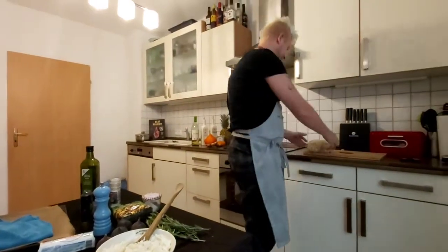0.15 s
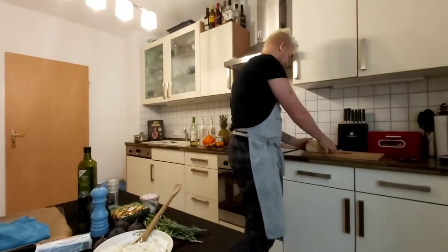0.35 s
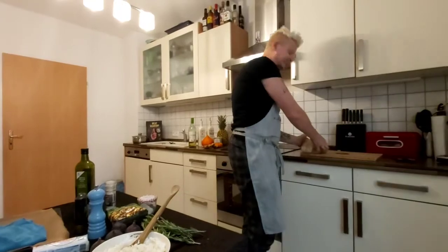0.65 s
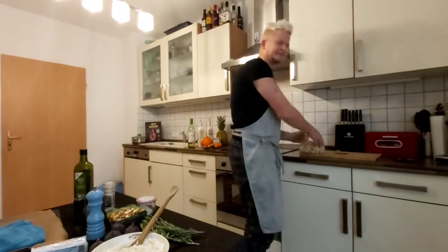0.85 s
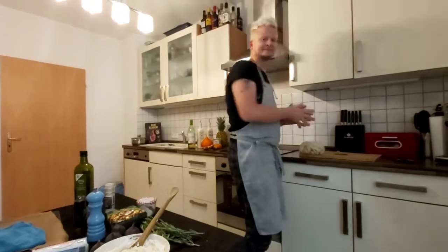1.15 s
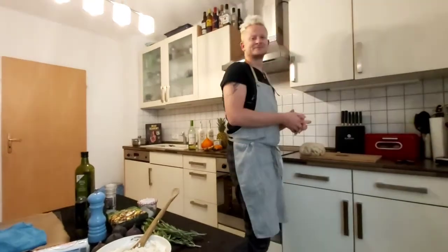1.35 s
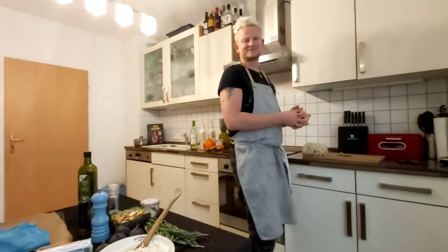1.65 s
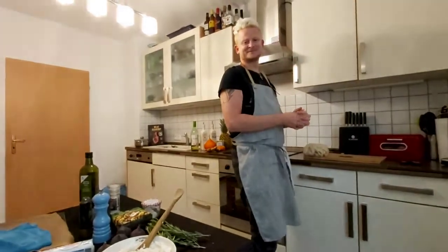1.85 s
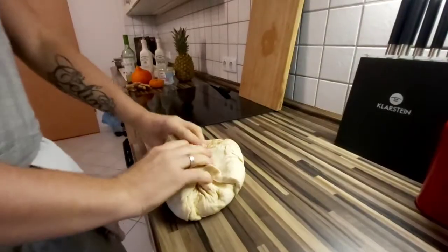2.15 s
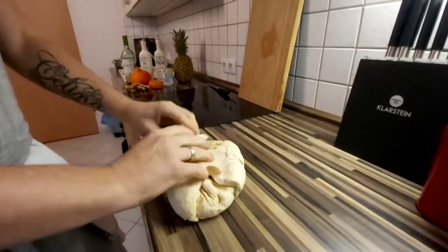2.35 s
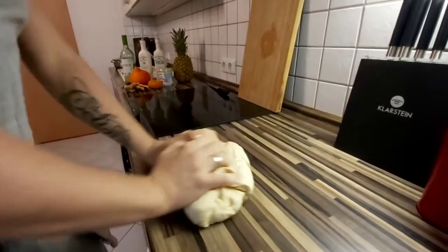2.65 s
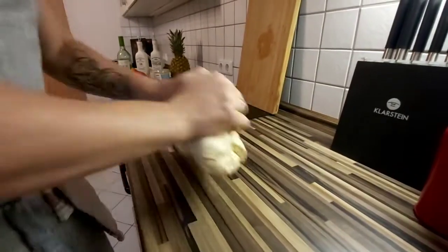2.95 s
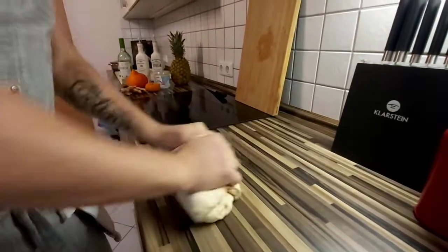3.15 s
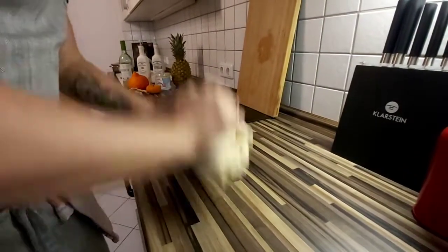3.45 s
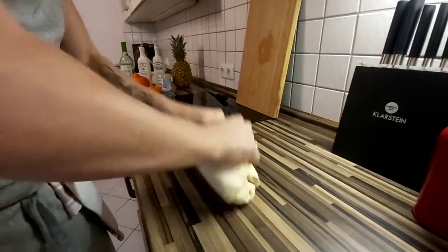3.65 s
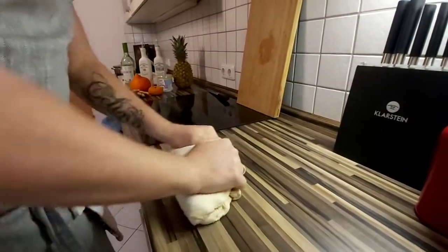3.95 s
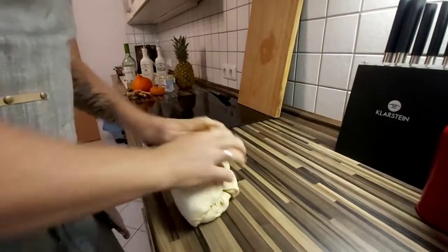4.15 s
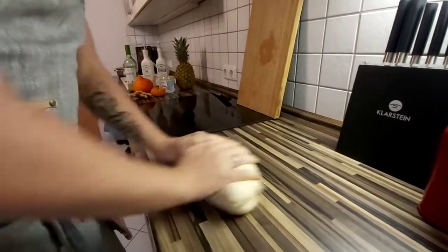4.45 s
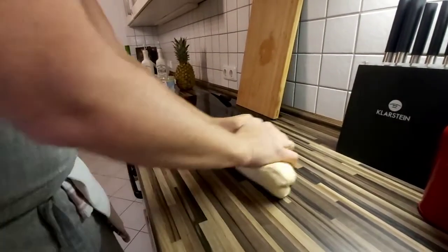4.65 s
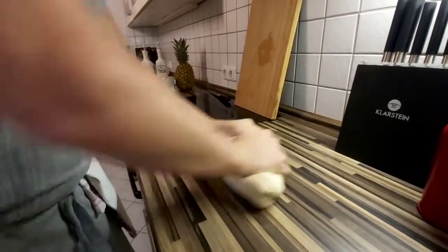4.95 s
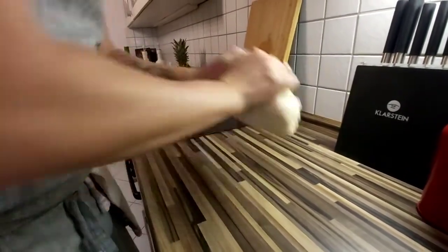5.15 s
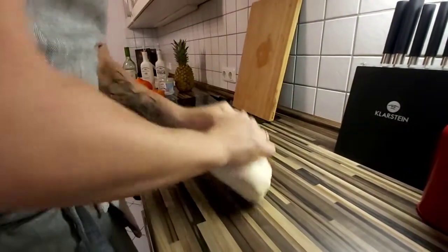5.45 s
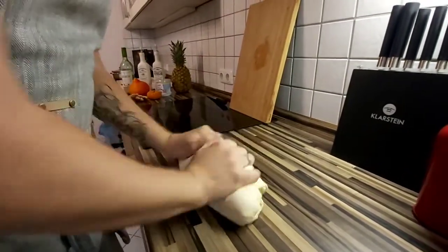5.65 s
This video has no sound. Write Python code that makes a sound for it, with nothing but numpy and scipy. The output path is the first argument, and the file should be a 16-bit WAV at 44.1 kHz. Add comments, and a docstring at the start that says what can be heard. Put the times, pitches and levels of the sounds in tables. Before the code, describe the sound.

In a tiled home kitchen a fridge hums while palms rub softly across the room. The microphone then sits on the worktop, where the hum is deeper and stronger and dough slides faintly over flour. The dough is slammed down three times, rubbed about, and slammed twice more. Each close, wet slap makes the slab boom and rings briefly around the tiles.

```python
"""Dough is worked by hand in a tiled kitchen, with a fridge humming. From across the room, palms rub
softly together and an air pocket pops. At 2.3 s the microphone is on the worktop itself: a faint ring
fades, the hum comes through the slab, and dough slides over flour. From 3.2 s the dough is slammed down
three times, rubbed about, then slammed twice more. Each slam slaps, sets the worktop booming, rings round
the tiles and makes the recorder's gain control duck."""
import sys
import numpy as np
from scipy import signal
from scipy.io import wavfile
from scipy.ndimage import uniform_filter1d

SR = 44100
rng = np.random.default_rng(int(sys.argv[2]) if len(sys.argv) > 2 else 0)


def inscribe(sig):
    """Save sig as 16-bit PCM at rate SR to the path in sys.argv[1].

    A 1-D sig is mono; a 2-D sig holds one channel per row.
    Samples are clipped to [-1, 1] before scaling.
    """
    pcm = np.round(np.clip(np.atleast_2d(sig).T, -1, 1) * 32767)
    wavfile.write(sys.argv[1], SR, pcm.astype(np.int16))


N = 255074
TIME = np.arange(N) / SR
ON_WORKTOP_S = 2.312   # until then the microphone stands across the room

# Dough meeting or peeling off the worktop; the five slams land close to the microphone.
# Each row: start in seconds, weight in dB, contact hardness in Hz, slap level in dB,
# slap decay in seconds, squelch pitch in Hz, room level in dB.
LANDINGS = [(.52, -38, 162, -70, 0.014, 1070, -34), (3.1725, 5.5, 900, -5, 0.0018, 3830, 8.5),
            (3.5821, 9.5, 1000, -3, .0018, 11500, 11.5), (3.9388, -3.5, 890, -12, 0.016, 1900, -22),
            (3.9525, 7, 71, -21, 0.0016, 870, -5.5), (4.334, -44, 924, -39, 0.0044, 7500, -34.5),
            (4.728, -33, 402, -52, 0.0033, 1090, -53), (5.112, -38.5, 395, -42, 0.0088, 4450, -54),
            (5.3851, 8.5, 1110, -3.5, 0.0034, 790, 13.5), (5.7217, 3, 211, -3.5, 0.0069, 4620, .5)]
# The wet slap, heard close. Each row: frequency in Hz, level in dB per Hz.
SLAP_SPECTRUM = [(150, 10), (400, 3), (800, 5.5), (1200, -0.5), (2000, -5.5), (4800, -5), (7600, -14),
                 (9000, -22.5), (12000, -12.5), (15000, -15.5)]
# What the tiles send back to the microphone. Each row: frequency in Hz, level in dB per Hz.
TILE_SPECTRUM = [(40, 0.5), (160, -6), (280, 2.5), (500, -2), (780, -4.5), (1200, -11), (2200, -12),
                 (3200, -16), (4400, -16), (7500, -23.5), (9000, -30), (12000, -20.5), (15000, -31)]
# How long the kitchen rings. Each row: frequency in Hz, seconds to fall by 60 dB.
TILE_T60 = [(50, 0.92), (350, 0.71), (900, 0.72), (2400, 0.66), (6400, 0.46), (10000, 0.37), (14000, 0.32)]


def slams(room_db=-18, room_build_s=0.0096, puff_db=-9, puff_hz=330, puff_s=0.00051,
          squelch_db=4, crack_db=5):
    """Dough lands on one spot: a wet slap, a puff of squeezed air, the slab's boom and the tiled room."""
    out, t, boom = np.zeros((2, N)), TIME[:SR], worktop()
    room = noise(TILE_SPECTRUM, size=SR, t60=TILE_T60) * (1 - np.exp(-t / room_build_s))
    puff = -np.sin(2 * np.pi * puff_hz * t) * np.exp(-t / puff_s)
    thud = boom + from_db(puff_db) * puff
    splashes = noise(SLAP_SPECTRUM, size=len(LANDINGS) * 2048).reshape(2, len(LANDINGS), -1)
    for k, (s, weight_db, hard_hz, slap_db, slap_s, squelch_hz, echo_db) in enumerate(LANDINGS):
        soft = signal.butter(2, hard_hz, fs=SR, output="sos")   # a slow landing pushes only low modes
        add(out, s, from_db(weight_db) * signal.sosfilt(soft, thud))
        slap = from_db(slap_db) * splashes[:, k] * np.exp(-t[:splashes.shape[-1]] / slap_s)
        squelch = resonate(slap, squelch_hz, width_hz=450)   # air caught in a fold rings
        add(out, s, slap + from_db(squelch_db) * squelch)
        add(out, s + slap_s / 2, from_db(slap_db + crack_db) * snap())   # the last gap claps shut
        add(out, s, from_db(echo_db + room_db) * room)
    return out


# Modes of the worktop and its cabinet, right under the microphone.
# Each row: frequency in Hz, level in dB, seconds to fall by 60 dB.
WORKTOP_MODES = [(58.9, -22, 0.85), (70.1, -7.5, 0.12), (76.95, -7, 0.21), (100.2, -56, 1),
                 (105.73, -9.5, 0.59), (123.9, -14, 0.61), (138, -33.5, 0.44), (202.6, -49.5, 0.58),
                 (215.5, -21.5, 0.74), (220.4, -4, 0.078), (245.8, -18, 0.58), (263.5, -18.5, 0.51),
                 (288.2, -26.5, 0.51), (300.5, -16, 0.52), (326.6, -28.5, 1), (359, -30, 0.79),
                 (392.7, -19, 0.44), (470.6, -23.5, 0.52), (628, -22, 0.2), (727, -36.5, 1),
                 (769, -30, 0.46), (802, -38.5, 0.42), (930, -49, 0.7), (1090, -55, 0.94)]


def worktop(spread=0.26):
    """The slab takes a blow; neighbouring modes move in opposite senses, so the boom swells, then dies."""
    t, out = TIME[:SR], 0
    for k, (hz, db, t60) in enumerate(WORKTOP_MODES):
        # short waves reach the microphone's two ports out of step
        phase = spread * np.sqrt(hz / 300) * (-1) ** (k // 2) * np.array([[1], [-1]])
        decay = np.exp(-np.log(1000) * t / t60)
        out = out + (-1) ** k * from_db(db) * np.sin(2 * np.pi * hz * t + phase) * decay
    return out


# Air pockets, each right by one port of the microphone. Each row: start in seconds, level in dB,
# pitch in Hz, decay in seconds, left over right in dB.
AIR_POCKETS = [(0.769, -21.5, 2960, 0.000094, -27), (2.7954, -16.5, 890, 0.00051, 25)]


def pops(edge_db=-7, skin_db=-18):
    """Tiny air pockets burst: a sharp edge, the swing of the air, then the slower dough skin."""
    out = np.zeros((2, N))
    skin = from_db(skin_db) * swing(hz=300, decay_s=0.0012)
    for s, db, hz, decay_s, side_db in AIR_POCKETS:
        burst = from_db(edge_db) * snap() + swing(hz, decay_s) + skin
        add(out, s, -from_db(db + np.array([[side_db], [-side_db]]) / 2) * burst)
    return out


# Strokes of the hands, first across the room, then close by on the worktop.
# Each row: peak time in seconds, swell in seconds, rub level in dB, flour hiss level in dB.
HAND_STROKES = [(.09, 0.059, -63, -76), (.44, 0.095, -68.5, -82), (.57, .07, -63, -68.5),
                (.79, 0.057, -51, -59.5), (.93, .05, -89, -71), (1.12, .1, -75.5, -94),
                (1.46, 0.2, -61, -74.5), (1.77, 0.18, -98, -72), (2.08, .035, -69, -84),
                (2.48, 0.046, -82, -64.5), (2.67, 0.092, -77, -66), (2.785, 0.056, -53.5, -52),
                (2.918, 0.061, -47, -57), (4.22, 0.21, -44, -62), (4.6, 0.099, -52, -47),
                (4.878, 0.22, -58, -55.5), (5.109, 0.12, -51, -53.5)]
# Distant palms, close dough and the fine hiss of flour. Each row: frequency in Hz, level in dB per Hz.
PALM_SPECTRUM = [(500, 0), (900, -1), (1600, 2.5), (2200, 3), (2900, -3.5), (3600, -6), (4500, -4),
                 (7500, -8.5), (9000, -10)]
DOUGH_SPECTRUM = [(400, 11.5), (900, 4), (1600, 4), (2500, 2), (4300, 0.5), (5500, -4), (7500, -5),
                  (9000, -14.5)]
FLOUR_SPECTRUM = [(4000, -8), (7500, -5.5), (9000, -21.5), (12500, 5), (15000, -8)]


def rubbing(grain_db=1.0, stick_db=0.84, flour_db=3):
    """Palms rub together; later dough slides over flour. Both stick and catch in tiny grains."""
    palms, dough, flour = np.zeros((3, N))
    for s, swell_s, rub_db, hiss_db in HAND_STROKES:
        if s < ON_WORKTOP_S:
            palms += from_db(rub_db) * stroke(s, swell_s, release_s=0.093)   # the room draws out the tail
        else:
            dough += from_db(rub_db) * stroke(s, swell_s, release_s=0.049)
        flour += from_db(hiss_db) * stroke(s, swell_s, release_s=0.031)
    grains = rms_one(uniform_filter1d(rng.standard_normal(N), size=90))
    sticking = rms_one(uniform_filter1d(rng.standard_normal(N), size=700))
    roughness = rms_one(from_db(grain_db * grains + stick_db * sticking))
    return roughness * (palms * noise(PALM_SPECTRUM, size=N) * pan(db=-2)
                        + dough * noise(DOUGH_SPECTRUM, size=N) * pan(db=2)
                        + from_db(flour_db) * flour * noise(FLOUR_SPECTRUM, size=N))


def stroke(peak_s, swell_s, release_s, turn_s=0.014):
    """The hand gathers speed, turns and comes to rest; height 1."""
    early, late = np.minimum(TIME - peak_s, 0), np.maximum(TIME - peak_s, 0)
    return np.exp(-(early / swell_s) ** 2 - (np.hypot(late, turn_s) - turn_s) / release_s)


def cupped_palms(peak_s=1.37, half_length_s=0.06, db=-62, hz=2598, width_hz=650):
    """Across the room, the hollow between the hands rings as they rub."""
    swell = np.exp(-((TIME - peak_s) / half_length_s) ** 2 / 2)
    cavity = rms_one(resonate(hollow(hz, width_hz), hz, 2 * width_hz))
    return from_db(db) * swell * cavity * pan(db=-4)


# A faint ringing hiss, first heard from the worktop. Each row: centre in Hz, width in Hz, level in dB.
RING_BANDS = [(1780, 240, -63.5), (3284, 200, -76), (4230, 600, -67)]


def faint_ring(tick_db=-51, tick_s=0.013, ring_s=0.4):
    """A soft tick and a rough, thin ring that fades after it."""
    out = np.zeros((2, N))
    ring = sum(from_db(db) * hollow(hz, width_hz) for hz, width_hz, db in RING_BANDS)
    tick = from_db(tick_db) * rng.standard_normal((2, N)) * np.exp(-TIME / tick_s)
    add(out, ON_WORKTOP_S, tick + ring * np.exp(-TIME / ring_s))
    return out


# Kitchen air from across the room and from the worktop. Each row: frequency in Hz, level in dB per Hz.
AIR_ACROSS_ROOM = [(36, -1), (48, -4.5), (70, -11), (105, -1.5), (170, -10), (215, -4.5), (275, -5.5),
                   (370, 0), (560, -14.5), (1400, -29), (3500, -44.5), (15000, -42)]
AIR_AT_WORKTOP = [(28, -4), (50, -1.5), (75, 5.5), (115, 7), (170, -11.5), (290, 3.5), (390, -6),
                  (600, -16.5), (1200, -24), (4000, -39), (15000, -38)]
# The fridge from both microphone places.
# Each row: frequency in Hz, level across the room in dB, level through the worktop in dB.
FRIDGE_TONES = [(49, -67.5, -57.5), (100.3, -66, -42), (121, -72, -55), (144, -65, -69.5), (290, -68, -60),
                (359, -60, -77)]


def fridge_and_air(far_air_db=-53, near_air_db=-48, near_lift_db=1,
                   waver_hz=113.3, waver_db=-48, waver_from_s=4.2):
    """Room air and the fridge, which hums strongly through the worktop; a late tone makes it waver."""
    far = from_db(far_air_db) * noise(AIR_ACROSS_ROOM, size=N)
    near = from_db(near_air_db) * noise(AIR_AT_WORKTOP, size=N)
    for hz, room_db, slab_db in FRIDGE_TONES:
        tone = np.sqrt(2) * np.sin(2 * np.pi * (hz * TIME + rng.random()))
        far += from_db(room_db) * tone
        near += from_db(slab_db) * tone
    fade_in = np.clip((TIME - waver_from_s) * 10, 0, 1)
    waver = from_db(waver_db) * fade_in * np.sqrt(2) * np.sin(2 * np.pi * waver_hz * TIME)
    on_worktop = np.clip((TIME - ON_WORKTOP_S) * 200, 0, 1)
    return (1 - on_worktop) * far + on_worktop * (from_db(near_lift_db) * near + waver)


# How alike the kitchen sounds at the two ports. Each row: frequency in Hz, left-right correlation.
PORT_LIKENESS = [(60, 0.27), (200, 0.96), (500, 0.36), (750, 0.52), (1100, -0.17), (4000, 0.086),
                 (14000, -0.095)]


def noise(spectrum, size, t60=None):
    """Stereo noise in third-octave bands, rms 1 at its start; with t60 each band dies away."""
    out, power, t = 0, 0, np.arange(size) / SR
    edges = np.geomspace(28, 16000, 31)
    white = rng.standard_normal((2, 2, size + SR // 4))
    for k, (low, high) in enumerate(zip(edges, edges[1:])):
        if high < spectrum[0][0] or low > spectrum[-1][0]:
            continue
        hz = np.sqrt(low * high)
        mid, side = butterworth(white[k % 2], 2, [low, high], "band")[:, -size:]
        alike, gain = at_hz(PORT_LIKENESS, hz), from_db(at_hz(spectrum, hz))
        band = gain * (np.sqrt(1 + alike) * mid + np.sqrt(1 - alike) * side * [[1], [-1]])
        if t60:
            band *= np.exp(-np.log(1000) * t / at_hz(t60, hz))
        out += band
        power += gain ** 2 * 2 * (high - low) / (SR / 2)
    return out / np.sqrt(power)


def snap(hz=6500, decay_s=0.00012):
    """A sudden step of pressure that swings back and dies at once."""
    t = TIME[:SR // 50]
    return np.cos(2 * np.pi * hz * t) * np.exp(-t / decay_s)


def swing(hz, decay_s):
    """A quickly damped swing of pressure."""
    t = TIME[:SR // 50]
    return np.sin(2 * np.pi * hz * t) * np.exp(-t / decay_s)


def hollow(hz, width_hz):
    """Stereo noise in one resonance, rms 1."""
    return rms_one(resonate(rng.standard_normal((2, N)), hz, width_hz))


def resonate(x, hz, width_hz):
    """One resonance, gain 1 at its peak."""
    r = np.exp(-np.pi * width_hz / SR)
    feedback = [1, -2 * r * np.cos(2 * np.pi * hz / SR), r * r]
    return signal.lfilter(np.array([1, 0, -1]) * (1 - r * r) / 2, feedback, x)


def butterworth(x, order, hz, kind):
    return signal.sosfilt(signal.butter(order, hz, kind, fs=SR, output="sos"), x)


def from_db(db):
    return 10 ** (np.asarray(db) / 20)


def rms_one(x):
    return x / np.sqrt(np.mean(x ** 2) + 1e-20)


def at_hz(points, hz):
    frequencies, values = np.array(points).T
    return np.interp(np.log(hz), np.log(frequencies), values)


def pan(db):
    """Gains of constant power, left over right by db."""
    return rms_one(from_db(np.array([[db], [-db]]) / 2))


def add(out, s, sound):
    """Mix a sound in at s seconds."""
    start = round(s * SR)
    out[:, start:start + sound.shape[-1]] += sound[..., :N - start]


def scene():
    """All that reaches the microphone in the kitchen."""
    return slams() + pops() + faint_ring() + rubbing() + cupped_palms() + fridge_and_air()


def gain_control(x, limit_db=-9.5, recovery_db_per_s=5.5, detector_s=0.0038):
    """A loud slam turns the recorder's gain down at once; it creeps back over a second or two."""
    size = round(detector_s * SR)
    power = uniform_filter1d(np.mean(x ** 2, axis=0), size=size)
    excess_db = np.maximum(10 * np.log10(np.maximum(power, 1e-12)) - limit_db, 0)
    recovered_db = recovery_db_per_s * TIME
    cut_db = np.maximum.accumulate(excess_db + recovered_db) - recovered_db
    return x * from_db(-uniform_filter1d(cut_db, size=size))


def record(dry, port_hz=6200, left_treble_db=2, right_treble_db=-7, rumble_hz=34, cutoff_hz=14800):
    """The right port is duller; rumble is cut, the gain ducks, peaks are rounded and the top is cut."""
    low, high = (butterworth(butterworth(dry, 4, port_hz, kind), 4, port_hz, kind)
                 for kind in ("low", "high"))
    heard = low + from_db([[left_treble_db], [right_treble_db]]) * high
    ducked = gain_control(butterworth(heard, 2, rumble_hz, "high"))
    rounded = ducked / (1 + ducked ** 8) ** (1 / 8)
    return signal.sosfilt(signal.ellip(10, .1, 80, cutoff_hz, fs=SR, output="sos"), rounded)


dry = scene()
out = record(dry)
inscribe(out)
```